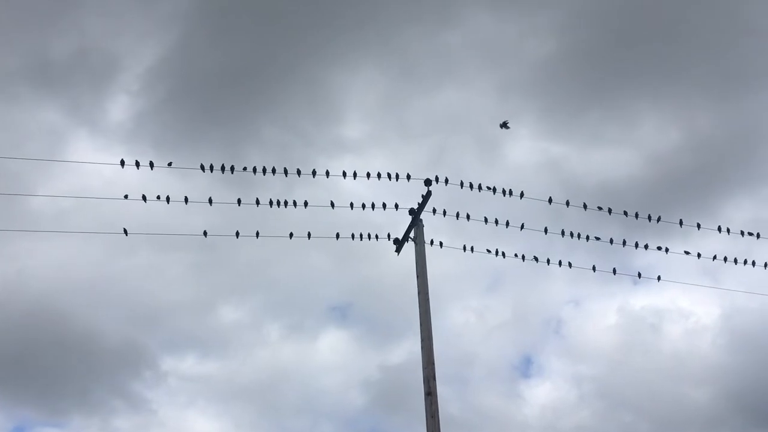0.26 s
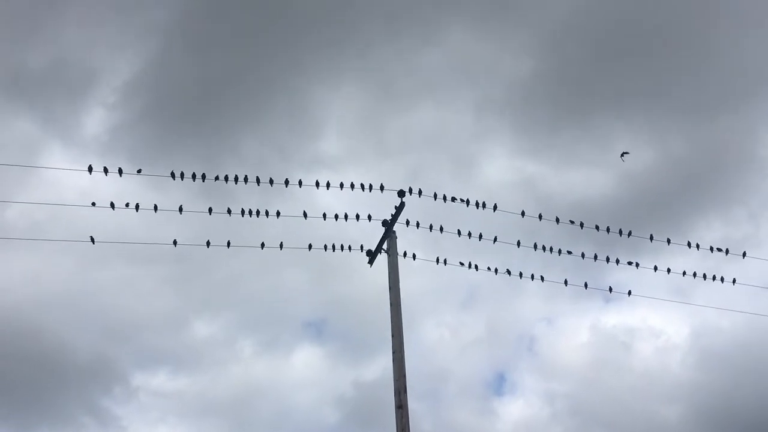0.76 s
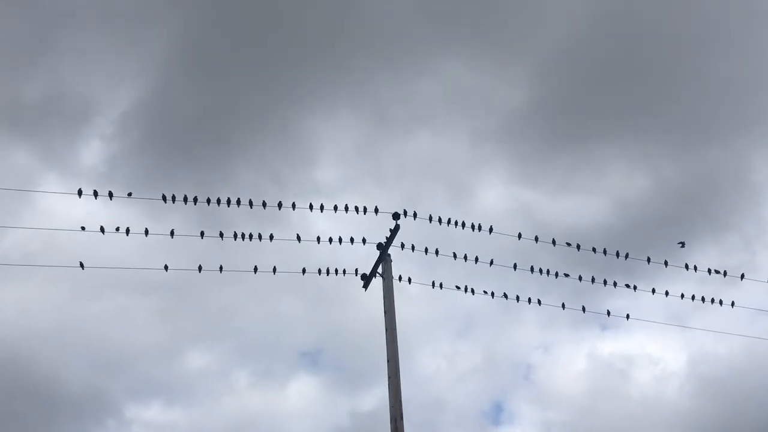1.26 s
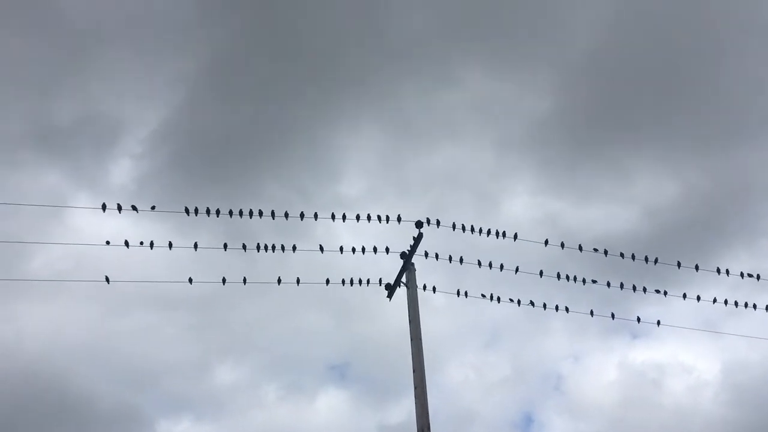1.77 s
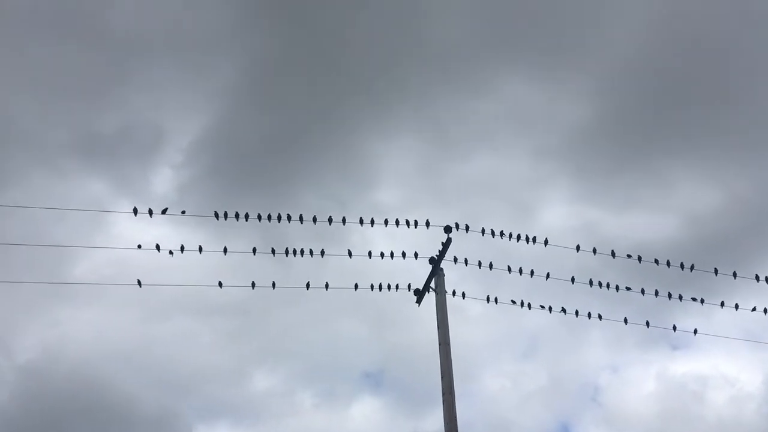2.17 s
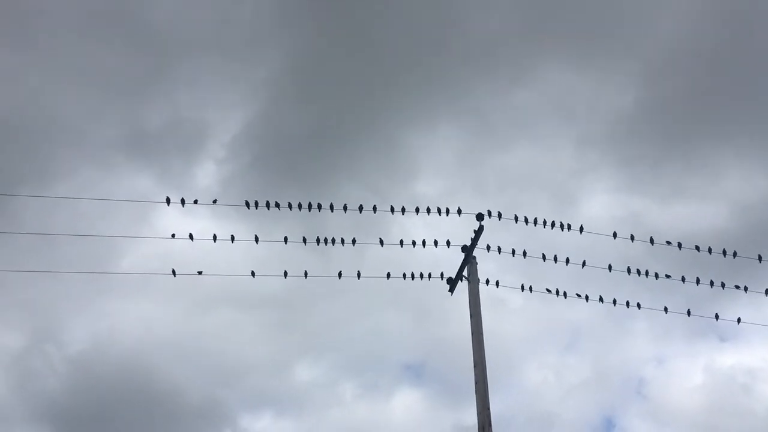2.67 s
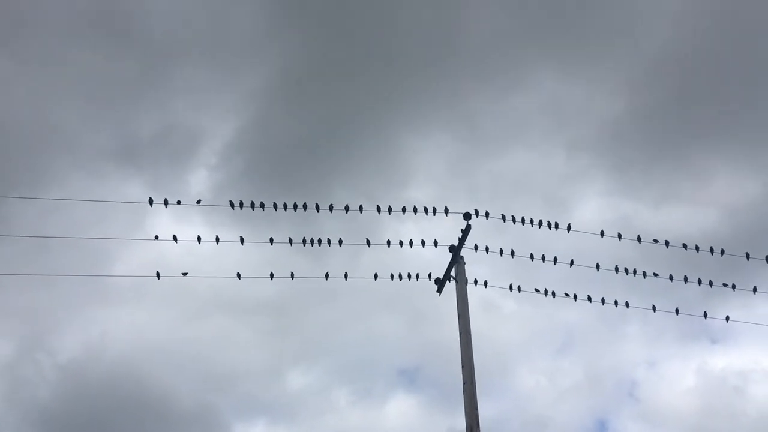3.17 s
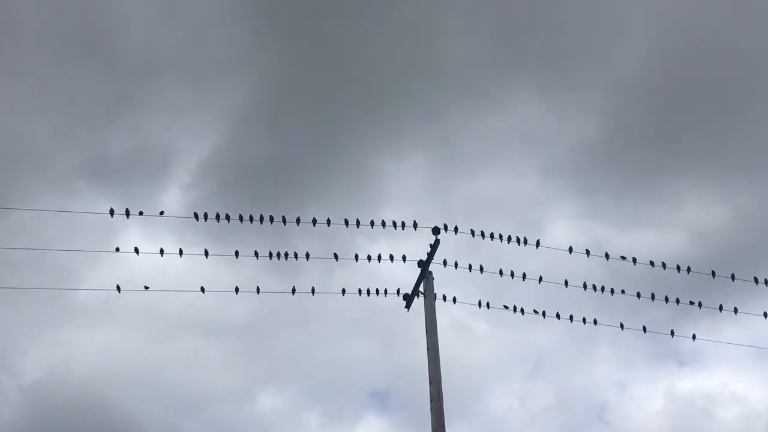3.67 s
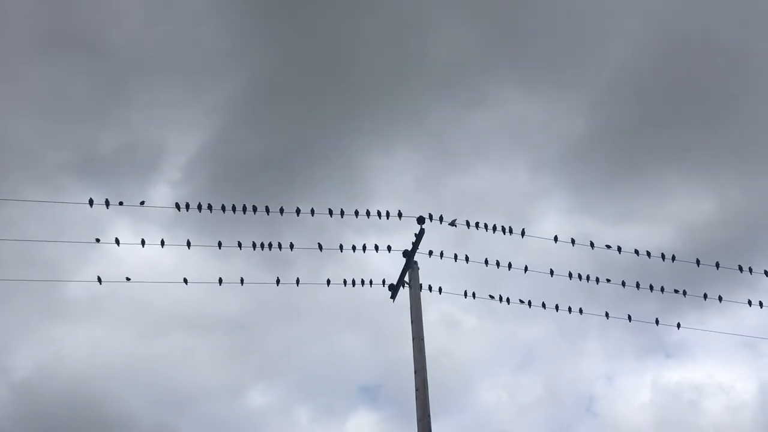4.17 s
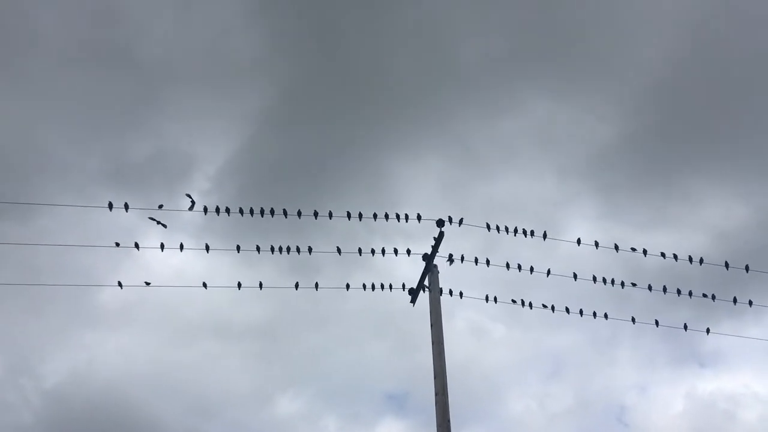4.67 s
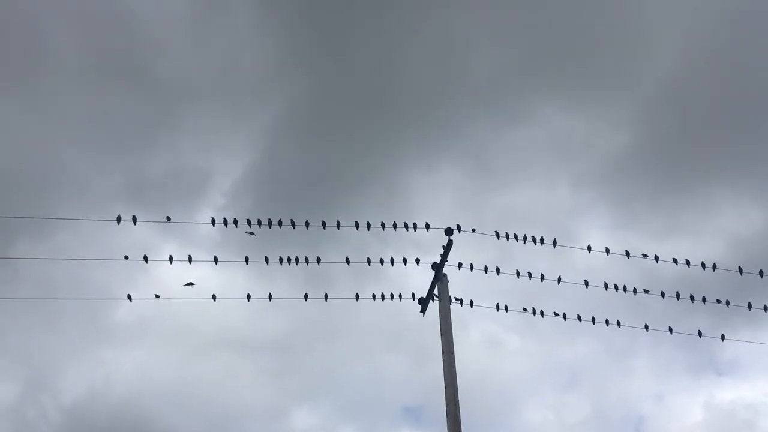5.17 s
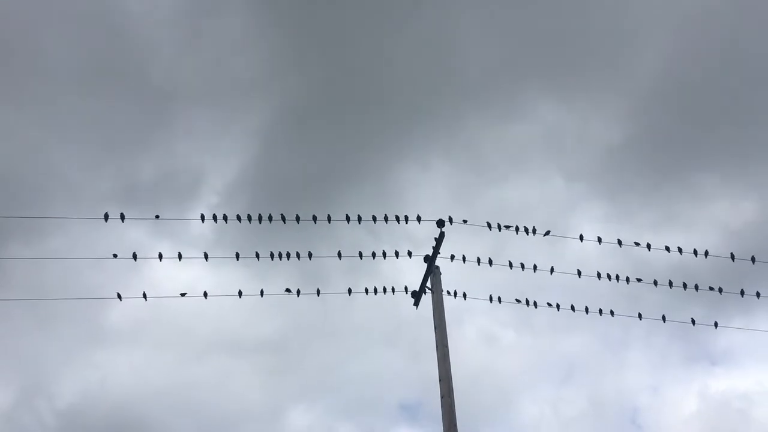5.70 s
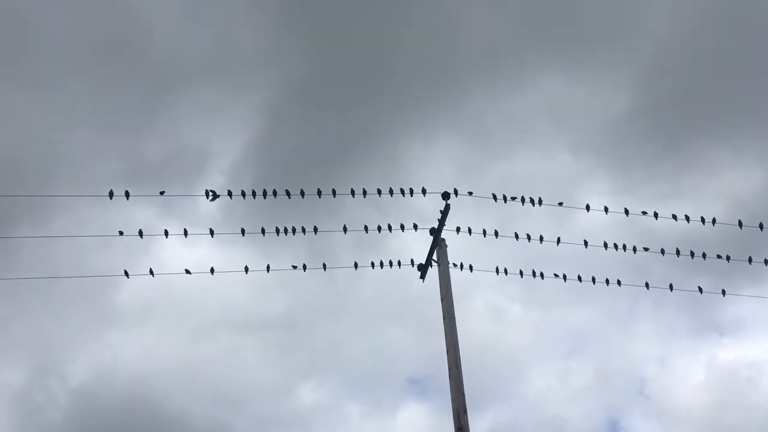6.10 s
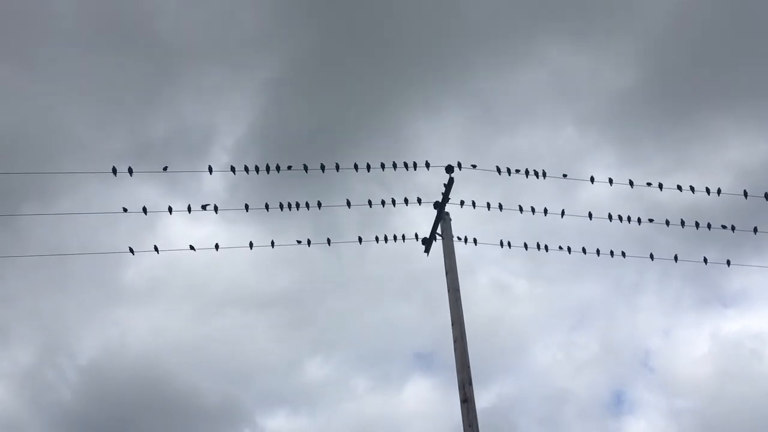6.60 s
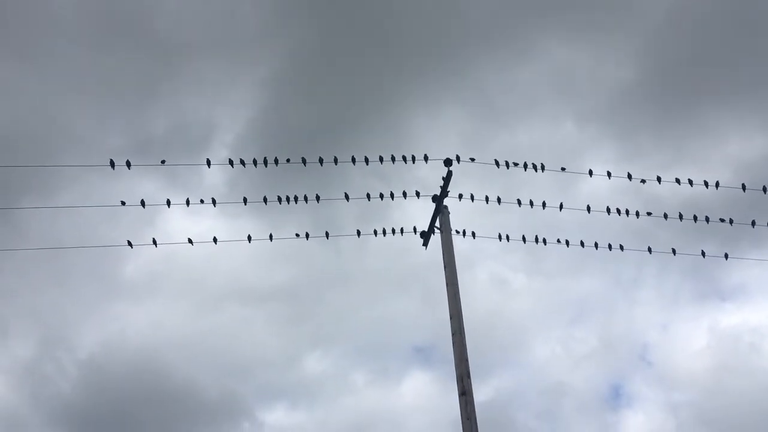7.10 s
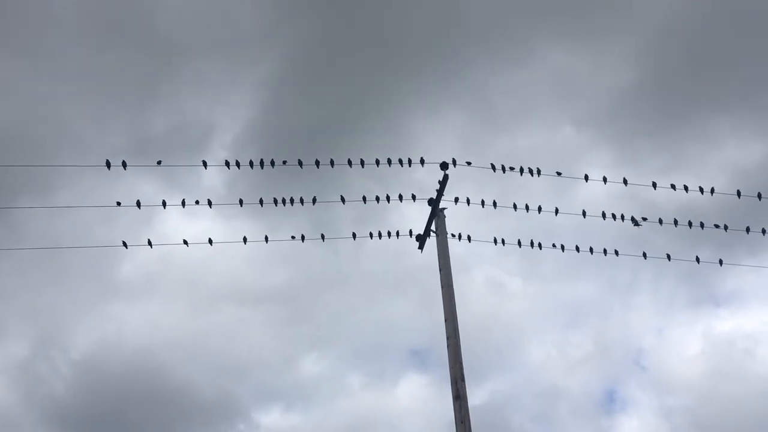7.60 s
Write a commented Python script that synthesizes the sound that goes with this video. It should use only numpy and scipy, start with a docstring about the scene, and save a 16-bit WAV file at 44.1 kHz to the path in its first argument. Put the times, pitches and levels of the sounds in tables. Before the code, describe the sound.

Outdoors, a large flock of starlings on wires twitters without pause. Tiny high chirps blur into a far babble, while nearer birds add quick sharp whistles, chopped trills, raspy puffs and two-toned squeaks. Low soft wind bumps hit the phone microphone, strongest near one second and near the end. The loudest swooping whistles come around seven seconds.

```python
"""A flock of starlings on overhead wires, heard from a phone on the ground in light wind.
Near birds whistle, trill and warble as wavering sines, squeak with two voices, and rasp in puffs of
squawk and breath noise. Thin whistles and a babble of tiny smeared calls make up the far flock.
Wind is shaped noise with low, sagging thumps on the microphone; a faint hiss of air lies beneath."""
import sys
import numpy as np
from scipy import signal
from scipy.fft import rfft, irfft
from scipy.io import wavfile
from scipy.ndimage import uniform_filter1d, map_coordinates

SR = 44100
rng = np.random.default_rng(int(sys.argv[2]) if len(sys.argv) > 2 else 0)


def digitize_waveform(pressure):
    """Quantize a signal to 16-bit integers and store it at the path in sys.argv[1].

    Rows of a 2-D input are taken as channels; values are limited to [-1, 1].
    """
    field = np.atleast_2d(pressure).T
    bounded = np.clip(field, -1, 1)
    quanta = np.round(bounded * 32767).astype(np.int16)
    wavfile.write(sys.argv[1], SR, quanta)


N = 346185

# Long near whistles, one list per curve. Each row: time in seconds, pitch in Hz, level in dB.
LONG_WHISTLES = [
    [(2.702, 2500, -79), (2.72, 2410, -44.5), (2.776, 3650, -43), (2.818, 3760, -49.5), (2.854, 3800, -58),
     (2.875, 3180, -42), (2.947, 2700, -52)],
    [(4.554, 6940, -70), (4.564, 7250, -54), (4.637, 6100, -60), (4.703, 5760, -58), (5.013, 4930, -70)],
    [(5.14, 4160, -69), (5.218, 3850, -60), (5.23, 3790, -52), (5.32, 3680, -56), (5.4, 3770, -64.5),
     (5.55, 3430, -66)],
    [(6.1, 8770, -64), (6.148, 8100, -57), (6.168, 8280, -61), (6.184, 7400, -68), (6.28, 5640, -61),
     (6.312, 6270, -66), (6.366, 5300, -70), (6.405, 5550, -63)],
    [(6.896, 2230, -58), (6.916, 2300, -53), (6.952, 3250, -36.5), (7.01, 3520, -47), (7.1, 3164, -51),
     (7.14, 3100, -43), (7.2, 2330, -47)],
    [(6.966, 6760, -78), (7.038, 6880, -52.5), (7.088, 6120, -49), (7.148, 6330, -54), (7.24, 5440, -54)],
    [(7.052, 2260, -62), (7.102, 2430, -43), (7.12, 2860, -36.5), (7.142, 3746, -34.5), (7.17, 3900, -34.5),
     (7.225, 3840, -37), (7.271, 4020, -46), (7.35, 3560, -43.5), (7.443, 2604, -40.5),
     (7.485, 2370, -47.5), (7.58, 2090, -59.5), (7.66, 2020, -60)],
    [(7.2, 2280, -41), (7.25, 2120, -50.5), (7.32, 1980, -58.5), (7.43, 1880, -64)],
    [(7.732, 9200, -53), (7.754, 8930, -37.5), (7.848, 7300, -44)],
]
# Short whistled notes. Each row: start in seconds, length in seconds, first pitch in Hz,
# turn as a share of the length, turn pitch in Hz, last pitch in Hz, level at the turn in dB.
SHORT_NOTES = [ (0.0, 0.1, 2560, 0.78, 2560, 2400, -53.5), (.002, 0.14, 6700, 0.41, 8380, 7340, -55.5),
               (0.119, 0.033, 7470, 0.21, 6800, 7750, -47), (0.484, 0.041, 2580, 0.25, 4860, 6670, -51),
               (0.505, 0.07, 5900, .42, 6330, 5340, -60), (0.514, 0.029, 2300, 0.54, 1440, 1400, -63),
               (0.527, .052, 6630, 0.72, 6700, 7000, -54), (0.581, 0.075, 6900, 0.3, 8970, 5100, -54),
               (0.605, 0.034, 5410, 0.42, 5800, 6030, -56), (0.932, 0.049, 5770, 0.67, 6330, 5300, -55),
               (1.117, 0.054, 1500, 0.55, 1770, 1430, -53.5), (1.191, 0.11, 2310, 0.84, 2590, 2290, -53),
               (1.306, .055, 7800, 0.59, 6900, 8000, -50), (1.352, 0.079, 7800, .2, 7900, 6400, -53),
               (1.424, 0.085, 6600, 0.78, 7650, 6630, -53), (1.666, 0.065, 6200, 0.59, 5900, 5200, -56),
               (1.66, 0.057, 3700, .51, 3200, 2820, -53), (1.661, 0.047, 5000, 0.72, 4790, 4250, -52.5),
               (1.71, 0.076, 8570, 0.86, 7140, 7660, -58.5), (2.012, 0.051, 7770, 0.53, 8240, 7870, -62),
               (2.156, 0.085, 2700, 0.31, 2760, 3420, -56), (2.199, 0.02, 4960, 0.55, 6850, 7250, -50),
               (2.22, .036, 6330, .6, 6630, 6470, -61), (2.26, 0.084, 6420, 0.23, 7620, 6800, -69),
               (2.432, 0.059, 2930, .51, 2820, 2630, -58.5), (2.75, 0.091, 6060, 0.27, 7150, 6050, -61),
               (2.809, 0.019, 2900, .51, 2560, 2190, -46), (2.95, 0.066, 7600, 0.5, 8600, 4300, -52.5),
               (3.063, 0.36, 1520, 0.82, 1312, 908, -64.5), (3.092, 0.024, 5850, 0.47, 7400, 5420, -59),
               (3.279, 0.069, 1850, .15, 1960, 1440, -62), (3.517, 0.096, 7200, 0.3, 6960, 5550, -57),
               (3.545, 0.1, 8760, 0.41, 8360, 8060, -56), (3.598, 0.05, 1240, 0.44, 1470, 1420, -61.5),
               (3.626, 0.12, 5930, .51, 5600, 5380, -72), (3.734, 0.043, 5380, 0.66, 4900, 4400, -60),
               (3.692, 0.12, 8230, 0.41, 7770, 7400, -58.5), (3.738, 0.028, 5700, 0.41, 6750, 7100, -56),
               (3.821, .015, 3430, .51, 3000, 2520, -55), (3.953, 0.11, 3610, 0.55, 3860, 3730, -53),
               (4.053, 0.13, 3490, 0.58, 3270, 3220, -54.5), (4.099, 0.011, 9800, .51, 8200, 5700, -51),
               (4.448, .082, 6940, 0.28, 7640, 7260, -56.5), (4.481, 0.062, 4250, 0.38, 4480, 4230, -56),
               (4.582, 0.075, 7570, 0.26, 7850, 6950, -56.5), (4.642, 0.074, 7090, 0.72, 7800, 7300, -62),
               (4.705, 0.079, 7330, .35, 7700, 6760, -56.5), (4.779, 0.048, 4080, .6, 3350, 3300, -53.5),
               (4.856, 0.044, 3700, 0.17, 4120, 3900, -66), (4.862, 0.072, 1150, 0.59, 1090, 890, -68),
               (4.99, 0.071, 2500, 0.56, 2446, 2430, -59.5), (5.045, 0.034, 5300, 0.42, 6200, 5600, -56),
               (5.338, 0.038, 800, .51, 1055, 1280, -62.5), (5.767, 0.044, 2660, .38, 5840, 4600, -60),
               (5.86, 0.1, 1300, 0.51, 1400, 1550, -67), (5.974, 0.027, 3360, 0.39, 2850, 2330, -49.5),
               (6.002, 0.075, 1400, 0.37, 1270, 1360, -61), (6.066, 0.032, 8220, .7, 8480, 9400, -54),
               (6.11, 0.039, 2000, 0.31, 2350, 2360, -57), (6.117, 0.02, 3870, 0.41, 5500, 7560, -42),
               (6.121, 0.16, 2875, 0.33, 3110, 3290, -59), (6.201, 0.087, 1600, 0.47, 1900, 2100, -63),
               (6.256, 0.022, 9000, 0.32, 3680, 3120, -49), (6.4, 0.034, 2600, 0.47, 3250, 4100, -66),
               (6.501, 0.0072, 5900, .51, 6250, 6600, -49), (6.92, 0.033, 5000, 0.23, 5940, 5200, -57),
               (7.515, 0.039, 4060, .38, 4480, 4770, -48), (7.559, 0.11, 6450, 0.55, 6170, 6000, -61),
               (7.749, 0.061, 1990, 0.64, 2650, 2370, -49.5), (7.704, 0.1, 4770, .51, 4350, 3950, -72),
               (7.791, 0.072, 3970, 0.72, 4770, 4900, -52)]
# Chopped whistles. Each row: the same seven columns as a short note, then mean beats a second,
# chopping depth from 0 to 1, octave overtone in dB.
TRILL_CALLS = [ (0.14, 0.13, 6500, 0.075, 6550, 7100, -48.5, 200, 0.76, -15),
               (0.287, 0.15, 6300, 0.22, 5650, 5330, -55, 128, 0.53, -24),
               (0.312, .038, 6650, .3, 6830, 7300, -60, 170, .8, -30),
               (0.368, 0.12, 5200, .8, 4750, 4670, -56.5, 96, 0.86, -8.5),
               (0.41, 0.079, 5300, 0.68, 5980, 5730, -59, 200, 0.2, -27),
               (0.652, 0.14, 5700, 0.29, 6970, 5600, -54, 186, 0.54, -18),
               (0.768, 0.16, 5950, 0.17, 6380, 5370, -56.5, 270, 0.63, -27),
               (2.35, 0.08, 5240, 1, 4400, 4600, -52, 162, 0.4, -15.5),
               (4.183, 0.086, 6800, 0.356, 6480, 7250, -47, 192, 0.18, -21),
               (4.24, 0.14, 5460, 0.28, 5150, 4770, -52, 196, 0.8, -8),
               (6.505, 0.085, 6180, 0.87, 6310, 6600, -47, 270, 0.9, -26),
               (6.576, 0.11, 6480, 0.51, 6030, 5830, -49.5, 300, 0.48, -25),
               (7.124, .15, 2290, .55, 2050, 1490, -51.5, 70, .25, -34)]
# Rasping calls. Each row: nominal start in seconds, nominal length in seconds, centre in Hz,
# spread in octaves, level in dB.
RASP_CALLS = [(.16, 0.064, 6700, 1.2, -59), (0.512, 0.21, 6500, 0.34, -57.5), (0.601, 0.2, 2400, 0.88, -60),
              (1.084, 0.2, 4300, 0.77, -64), (1.146, 0.023, 6500, 0.79, -62),
              (1.178, 0.035, 5400, 0.96, -52), (1.245, 0.086, 5600, 0.92, -55.5),
              (1.305, 0.068, 6540, 0.75, -55), (1.43, 0.015, 6840, 0.63, -49.5),
              (1.482, 0.039, 6940, 0.77, -55), (1.646, 0.073, 5230, 1.1, -50),
              (1.83, 0.071, 2530, 0.36, -51.5), (2.15, 0.062, 7850, 0.21, -65),
              (2.224, 0.043, 6150, 0.47, -64), (2.342, 0.025, 5430, 0.14, -54.5),
              (2.53, 0.17, 2570, 0.36, -53), (2.834, 0.11, 2870, 0.57, -54), (3.223, 0.061, 4660, 1.2, -58),
              (3.459, 0.017, 4470, 0.21, -65), (3.6, 0.094, 4050, 0.73, -59),
              (3.824, 0.027, 2840, 0.3, -51.5), (3.972, 0.09, 6700, 0.26, -69),
              (4.094, 0.015, 8000, 0.32, -59.5), (4.262, 0.024, 7900, 1, -48.5),
              (4.294, 0.13, 5930, 1, -55.5), (4.452, 0.11, 5000, 0.79, -57.5),
              (4.72, 0.09, 2450, 0.54, -53.5), (5.031, 0.064, 5400, 1.1, -57.5),
              (5.231, 0.088, 5740, 0.6, -56), (5.317, 0.037, 8400, 0.16, -59),
              (5.345, 0.1, 6200, 0.83, -59), (5.546, 0.23, 6360, 0.54, -57.5),
              (5.941, 0.073, 4730, 0.58, -56.5), (6.112, 0.033, 5500, 0.83, -53),
              (6.449, 0.028, 6240, 0.16, -49), (6.522, 0.025, 5440, 0.66, -48.5),
              (6.563, 0.018, 7300, 0.54, -51.5), (6.764, 0.1, 5550, 0.6, -48),
              (6.972, 0.019, 6500, 0.84, -59), (7.262, .13, 6300, 0.42, -53),
              (7.411, 0.077, 4170, 0.25, -52), (7.52, 0.027, 6900, 0.67, -53),
              (7.802, 0.051, 2700, 0.79, -53)]
# Resonances of the throat. Each row: centre in Hz, width in Hz, gain in dB.
THROAT_RESONANCES = [(2360, 1700, 5.5), (4400, 410, -1.5), (6080, 1220, 1), (9230, 1700, -9.5),
                     (13300, 2500, -15)]
# Zigzag whistles. Each row: start in seconds, length in seconds, first pitch in Hz, last pitch in Hz,
# swing as a share of the pitch, mean swings a second, middle level in dB.
WARBLE_CALLS = [(1.516, 0.063, 7400, 3900, 0.15, 81, -56.5), (2.231, 0.051, 3500, 4170, 0.2, 62, -57),
                (2.432, .036, 5900, 6000, 0.12, 93, -63), (3.755, .072, 4470, 4070, 0.035, 45, -57),
                (4.0, 0.048, 6200, 6100, 0.11, 52, -62), (5.503, 0.047, 4970, 5620, .13, 50, -53),
                (5.555, 0.062, 6220, 5340, 0.175, 64, -53.5), (5.623, 0.037, 5610, 6700, .04, 56, -48),
                (5.656, 0.074, 6820, 5650, .13, 120, -52)]
# Arch-and-hook squeaks. Each row: time of the dip in seconds, pitch factor of the arch,
# length factor of the arch, base level in dB.
SQUEAK_CALLS = [(1.81, 0.99, 0.84, -52), (2.097, 1.04, 0.23, -62), (2.86, 1.01, 0.73, -54),
                (3.261, 0.9, 0.97, -64.5), (4.404, 0.9, 1.2, -53.5), (5.132, 0.99, 0.95, -50.5),
                (5.388, 0.87, 1.1, -52), (6.449, 0.98, 1.3, -57), (7.502, 0.92, 1.3, -59)]
# Common outline of a squeak. Each row: time from the dip in seconds, pitch in Hz,
# level against the base in dB, octave overtone in dB. The call's factors apply before the dip only.
SQUEAK_OUTLINE = [(-.042, 4080, -3, 0), (-.028, 5305, -0.5, -18), (-.014, 6440, 8, -20),
                  (-.002, 4845, 1.5, -7), (.004, 7300, 2, -39), (0.017, 7850, -1.5, -28),
                  (.04, 7050, -5, -25), (.062, 6780, -9, -30)]
# Side tones of the second voice, in dB: one step above, one below, two above.
SIDE_TONES_DB = (-10, -15, -22)
# Overtones of a whistle. Each row: multiple of the pitch, level in dB when blown at EFFORT_DB or harder.
WHISTLE_OVERTONES = [(2, -17), (3, -16)]
# Loudness of the far flock. Each row: time in seconds, level in dB.
BABBLE_LEVELS = [(0.0, -54.5), (0.52, -61), (0.85, -56), (1.99, -53), (2.47, -59), (2.78, -59),
                 (2.97, -59.5), (3.3, -64), (4.57, -51.5), (4.87, -58.5), (6.19, -57), (6.56, -63),
                 (6.97, -53), (7.11, -60.5), (7.26, -50), (7.85, -56)]
# Tone colour of the far flock. Each row: frequency in Hz, relative gain in dB.
BABBLE_TONE = [(800, -8.5), (1300, -12), (1800, -8), (2200, -1.5), (2900, -3.5), (3800, -5), (5000, -10),
               (7000, -10), (9500, -13), (11000, -9)]
# Loudness of the wind rumble. Each row: time in seconds, level in dB.
GUST_LEVELS = [(0.0, -61), (0.59, -53.5), (1.57, -58), (2.3, -60), (2.82, -52), (3.23, -65), (3.85, -59),
               (4.28, -65.5), (6.01, -59.5), (6.27, -52), (6.71, -60), (7.52, -54), (7.67, -54),
               (7.85, -44)]
# Spectrum of the wind rumble. Each row: frequency in Hz, relative gain in dB.
WIND_TONE = [(25, -24), (42, -1.5), (60, 1), (85, -5.5), (130, -14), (200, -23.5), (300, -26.5),
             (450, -35.5), (800, -97)]
# Eddies that thump. Each row: time of the peak in seconds, nominal pitch in Hz, peak envelope in dB.
EDDY_THUMPS = [(0.227, 163, -45), (0.336, 68.4, -44.5), (0.407, 127, -43), (0.437, 188, -52),
               (0.46, 92.5, -47), (0.599, 63, -42.5), (0.677, 122, -37), (0.694, 96, -38.5),
               (0.742, 99, -42.5), (0.911, 97, -42), (0.946, 121, -31.5), (1.046, 79.7, -38.5),
               (1.135, 76, -45), (1.237, 58, -48), (1.982, 61, -45), (2.436, 71.4, -43.5),
               (2.792, 72.5, -43), (2.871, 62.5, -42.5), (2.925, 81, -42), (2.989, 59.3, -45.5),
               (3.124, 83, -50), (3.734, 65.7, -46), (3.843, 67, -46.5), (3.932, 57.7, -46.5),
               (4.014, 76, -45), (4.161, 63, -44.5), (6.116, 77.6, -37), (6.299, 70, -42.5),
               (6.4, 80.4, -40.5), (6.458, 87, -43.5), (6.504, 77, -38.5), (6.696, 65.6, -45),
               (6.899, 75, -47.5), (6.947, 70, -35.5), (6.99, 61.3, -49), (7.287, 102, -46.5),
               (7.43, 63, -46.5), (7.503, 64, -39), (7.545, 72, -26.5), (7.66, 67, -42.5),
               (7.711, 70.4, -46), (7.758, 89, -33), (7.811, 138, -30)]
# Spectrum of the distant hiss. Each row: frequency in Hz, relative gain in dB.
AIR_TONE = [(88, -45), (150, -1.5), (454, -8), (782, -7.5), (1570, -8), (2610, -4), (4860, -19.5),
            (6010, -13), (7740, -24), (9040, -16.5), (15600, -20)]

START_DB, END_DB = -4, -5  # a call swells to its turn and fades after it
ARCH = 0.65  # share of the climb done halfway to a peak or dip: rounds the turn
WAVER, WAVER_HZ = 0.019, 7850  # share by which a whistle at this pitch wanders; low ones are steadier
STEEP_DB = -1  # level change of a whistle for each 100 kHz a second of glide
EFFORT_DB = -29.5  # below this level a whistle's overtones weaken
SECOND_VOICE_HZ = 1700  # step to the side tones, from the other half of the syrinx
AIR_DB = -63.5
MIC_DIP_HZ, MIC_DIP_WIDTH_HZ, MIC_DIP_DB = 10470, 295, -5
TOP_HZ = 15620


def undb(db):
    """Turn decibels into an amplitude factor."""
    return 10 ** (np.asarray(db) / 20)


def level(x, db):
    """Set the RMS level of x."""
    return x * undb(db) / np.sqrt(np.mean(x ** 2))


def level_curve(rows):
    """Amplitude over the whole scene, gliding in dB between timed levels."""
    s, db = np.transpose(rows)
    return undb(np.interp(np.arange(N) / SR, s, db))


def add(out, start_s, x):
    """Mix x into out from start_s on, trimming what falls outside."""
    i = int(start_s * SR)
    x, i = x[max(-i, 0):N - i], max(i, 0)
    out[i:i + len(x)] += x


def colour(x, points):
    """Filter by (Hz, dB) points, joined along a logarithmic frequency scale."""
    hz, db = np.transpose(points)
    f = np.arange(len(x) // 2 + 1) * SR / len(x) + 1
    gain = undb(np.interp(np.log(f), np.log(hz), db))
    return irfft(rfft(x) * gain, len(x))


def walk(rate, size):
    """Smooth random wander with `rate` knots a second, spread near 1."""
    knots = rng.standard_normal(int(size * rate / SR) + 3)
    return map_coordinates(knots, [np.arange(size) * rate / SR], order=3)


def fade(size, edge_s):
    """Soft start and end."""
    i = np.arange(size)
    return np.clip(np.minimum(i, size - i) / (edge_s * SR), 0, 1)


def trace(rows):
    """Columns of a call at every sample, corners rounded."""
    s, *columns = np.transpose(rows)
    t = s[0] + np.arange(int((s[-1] - s[0]) * SR) + 2) / SR
    return [uniform_filter1d(np.interp(t, s, c), size=200, mode="nearest") for c in columns]


def tone(hz, gain, rough=0.098):
    """A sine with a fast ragged flutter; silent near the top of the band."""
    flutter = 1 + rough * walk(450, len(hz))
    in_band = hz < .4 * SR
    turns = np.cumsum(hz) / SR + rng.random()
    return np.sqrt(2) * gain * flutter * in_band * np.sin(2 * np.pi * turns)


def bend(s, length, first_hz, turn, turn_hz, last_hz, db):
    """A call glides to a turning pitch, where it is loudest, and on to its last; peaks and dips are rounded."""
    top = np.clip(turn, .05, .95) * length
    is_peak_or_dip = (turn_hz - first_hz) * (turn_hz - last_hz) > 0
    half = ARCH if is_peak_or_dip else .5
    return [(s, first_hz, db + START_DB),
            (s + top / 2, first_hz + half * (turn_hz - first_hz), db + START_DB / 2),
            (s + top, turn_hz, db),
            (s + (top + length) / 2, last_hz + half * (turn_hz - last_hz), db + END_DB / 2),
            (s + length, last_hz, db + END_DB)]


def whistle(rows, waver=WAVER):
    """A near sine that wavers; the harder it is blown, the richer its overtones."""
    hz, db = trace(rows)
    glide = np.abs(np.gradient(hz)) * SR  # Hz a second
    db = db + STEEP_DB * glide / 10 ** 5
    fast_waver = 0.0076 * walk(110.4, len(hz))
    slow_waver = waver * (hz / WAVER_HZ) ** 2 * walk(44.8, len(hz))
    hz = hz * (1 + fast_waver + slow_waver)
    gain = undb(db + 2.62 * walk(68.0, len(hz))) * fade(len(hz), 0.0029)
    rich = gain * undb(0.96 * np.minimum(db - EFFORT_DB, 0))
    overtones = sum(tone(k * hz, rich * undb(over_db)) for k, over_db in WHISTLE_OVERTONES)
    return tone(hz, gain, rough=0.15) + overtones


def trill(rows, rate, depth, octave_db):
    """A whistle chopped into short uneven blips that scatter in pitch and slide down."""
    hz, db = trace(rows)
    beat = np.cumsum(rate * undb(2.26 * walk(34.8, len(hz)))) / SR
    # every blip draws its own loudness and pitch
    blip_db, blip_pitch = rng.standard_normal((int(beat[-1]) + 2, 2))[beat.astype(int)].T
    gate = 1 - depth + 2.4 * depth * np.sin(np.pi * beat) ** 6 * undb(3.5 * blip_db)
    slide = .05 * np.cos(np.pi * (beat % 1))
    hz = hz * (1 + .012 * walk(90, len(hz)) + depth * (.028 * blip_pitch + slide))
    gain = undb(db) * gate * fade(len(hz), 0.002)
    return tone(hz, gain, rough=0.27) + tone(2 * hz, gain * undb(octave_db))


def rasp(length, hz, spread, db, pulsed=.65):
    """Uneven puffs of an unsteady squawk and breath noise through the throat resonances."""
    size = int(1.25 * length * SR) + 300  # room for the swell and fade
    beat = np.cumsum(rng.uniform(140, 210) * (1 + 0.31 * walk(60, size))) / SR % 1
    fold_drift = undb(1.2 * walk(45, size) + 0.283 * walk(502.4, size))
    folds = np.cumsum(rng.uniform(1100, 1700) * fold_drift) / SR
    squawk = sum(np.sin(2 * np.pi * k * folds) for k in range(1, 10)) / 2
    source = squawk + .5 * rng.standard_normal(size)
    pulse = 1 - pulsed + 2.5 * pulsed * np.exp(-beat / .22)
    puffs = pulse * undb(3 * walk(70, size)) * source
    f = np.arange(size // 2 + 1) * SR / size + 1
    throat = 0.14 + sum(undb(d) / (1 + (2 * (f - c) / w) ** 2) for c, w, d in THROAT_RESONANCES)
    band = np.exp(-.5 * (np.log2(f / hz) / spread) ** 2)
    sound = irfft(rfft(puffs) * throat * band, size)
    swell = np.sin(np.pi * np.linspace(0, 1, size) ** .65) ** .55
    return level(sound * swell, db)


def warble(length, first_hz, last_hz, swing, rate, db):
    """A whistle that zigzags fast and unevenly about a gliding pitch, loudest on the strokes' tops."""
    size = int(length * SR)
    wave = -np.cos(2 * np.pi * np.cumsum(rate * undb(2.5 * walk(40, size))) / SR)
    hz = np.linspace(first_hz, last_hz, size) * (1 + swing * wave * undb(2.6 * walk(44.6, size)))
    gain = undb(db + 2.6 * wave + 2.9 * walk(111, size)) * fade(size, 0.0045)
    return tone(hz, gain, rough=0.33)


def squeak(pitch, length, db):
    """An arch, a dip and a hook; a second voice leaves broken side tones a fixed step away, over a rasp."""
    outline = [(s * length, f * pitch, d, o) if s < 0 else (s, f, d, o) for s, f, d, o in SQUEAK_OUTLINE]
    hz, shape_db, octave_db = trace(outline)
    hz = hz * (1 + 0.0115 * walk(132.6, len(hz)))
    gain = undb(db + shape_db + 2.76 * walk(92.4, len(hz))) * fade(len(hz), 0.0097)
    sides = sum(tone(hz + k * SECOND_VOICE_HZ, gain * undb(d + 5 * walk(70, len(hz))), rough=.6)
                for k, d in zip((1, -1, 2), SIDE_TONES_DB))
    out = tone(hz, gain) + tone(2 * hz, gain * undb(octave_db), rough=0.21) + sides
    breath = rasp(0.062 * length, 7000 * pitch, 0.76, db - 3)
    out[:len(breath)] += breath[:len(out)]
    return out


def near_birds():
    """The calls that stand out, each placed at its own time."""
    out = np.zeros(N)
    for rows in LONG_WHISTLES:
        add(out, rows[0][0], whistle(rows, waver=.004))
    for note in SHORT_NOTES:
        add(out, note[0], whistle(bend(*note)))
    for row in TRILL_CALLS:
        add(out, row[0], trill(bend(*row[:7]), *row[7:]))
    for s, *row in WARBLE_CALLS:
        add(out, s, warble(*row))
    for s, pitch, length, db in SQUEAK_CALLS:
        add(out, s + SQUEAK_OUTLINE[0][0] * length, squeak(pitch, length, db))
    for s, length, hz, spread, db in RASP_CALLS:
        add(out, s - .1 * length, rasp(length, hz, spread, db))
    return out


def scatter(x, decay_s, db):
    """Add a short diffuse tail from the ground and the wires: decaying noise as an echo pattern."""
    tail = rng.standard_normal(8000) * np.exp(-np.arange(8000) / SR / decay_s)
    return x + signal.fftconvolve(x, level(tail, db) / np.sqrt(len(tail)))[:N]


def far_whistles(count=120):
    """Thin wavering whistles from birds further along the wires, gliding gently."""
    out = np.zeros(N)
    for s, high, long, turn, rise, fall, loud in rng.random((count, 7)):
        hz = 1650 * 2.7 ** high
        length = 0.0298 + .1 * long ** 2
        first_hz, last_hz = hz * (.78 + 0.33 * rise), hz * (.72 + 0.32 * fall)
        add(out, s * N / SR, whistle(bend(0, length, first_hz, turn, hz, last_hz, -73 + 8 * loud)))
    return scatter(out, 0.025, -7.5)


def babble(count=2500):
    """Far birds: tiny steep chirps, warbles, trills and rasps, smeared by echoes; long notes are fainter."""
    out = np.zeros(N)
    for s, kind, high, long, rise, fall, loud in rng.random((count, 7)):
        start, length = s * N / SR, .009 + .07 * long ** 3.5
        hz = 1050 * 9.5 ** high
        db = 10 * loud ** 1.5 - 8 * long  # balance among the calls
        first_hz, last_hz = hz * (.65 + .55 * rise), hz * (.6 + .55 * fall)
        rows = [(0, first_hz, db - 4.0), (.45 * length, hz, db), (length, last_hz, db + 0.5)]
        if kind < .12:
            add(out, start, rasp(1.75 * length, 1800 * 3.15 ** high, 0.5, db, pulsed=0.13))
        elif kind < .27:
            add(out, start, warble(2 * length, first_hz, last_hz, .12, 90, db - 3))
        elif kind < .42:
            add(out, start, trill(rows, 187.3, 0.6, -44))
        else:  # plain chirp
            pitch, chirp_db = trace(rows)
            add(out, start, tone(pitch, undb(chirp_db) * fade(len(pitch), 0.0053), rough=0.074))
    uneven = out * undb(1.5 * walk(9, N))
    smeared = colour(scatter(uneven, .028, -8), BABBLE_TONE)
    return level(smeared, 0) * level_curve(BABBLE_LEVELS)


def wind():
    """Eddies buffet the port: an uneven rumble, and thumps that peak sharp and sag in pitch."""
    rumble = colour(rng.standard_normal(N) * undb(3.1 * walk(23, N)), WIND_TONE)
    out = level(rumble, 0) * level_curve(GUST_LEVELS)
    for (s, hz, db), (turn, linger, drop) in zip(EDDY_THUMPS, rng.random((len(EDDY_THUMPS), 3))):
        cycles = np.arange(-1.5, 4, hz / SR)  # time from the peak, in nominal cycles
        width = np.where(cycles < 0, .4, 0.55 + 1.46 * linger)
        shape = np.exp(-.5 * (cycles / width) ** 2)
        sag = 0.739 + (.35 + 0.41 * drop) * 2 * np.exp(-np.abs(cycles + 0.26) / 0.42)  # pitch factor
        wave = np.sin(2 * np.pi * (np.cumsum(sag) * hz / SR + turn))
        add(out, s - 1.5 / hz, undb(db) * shape * wave)
    return out


def air():
    """Distant hiss: coloured noise whose level drifts slowly."""
    hiss = level(colour(rng.standard_normal(N), AIR_TONE), AIR_DB)
    return hiss * undb(0.82 * walk(3.065, N))


def scene():
    """Near birds with a short tail, over the far flock, the wind and the air."""
    near = scatter(near_birds(), .03, -14)
    return (near + far_whistles() + babble() + wind() + air())[None]


def record(dry):
    """The microphone port has a narrow dip; the top is cut by a steep low-pass."""
    f = np.arange(N // 2 + 1) * SR / N
    dip = undb(MIC_DIP_DB * np.exp(-.5 * ((f - MIC_DIP_HZ) / MIC_DIP_WIDTH_HZ) ** 2))
    low_pass = signal.ellip(10, .2, 70, TOP_HZ, fs=SR, output="sos")
    return signal.sosfilt(low_pass, irfft(rfft(dry) * dip, N))


dry = scene()
out = record(dry)
digitize_waveform(out)
```